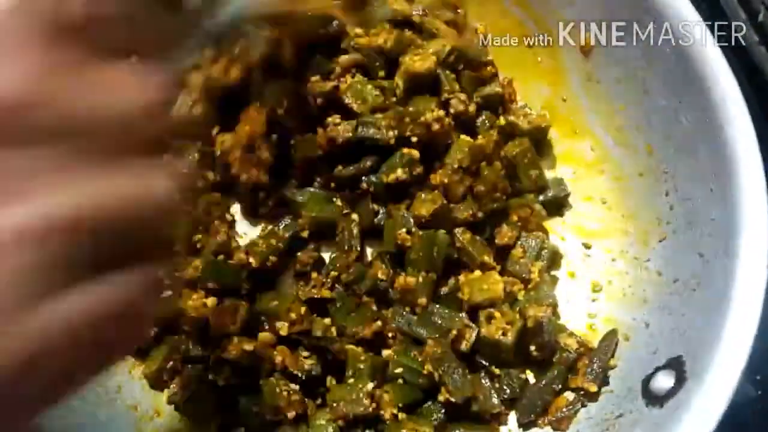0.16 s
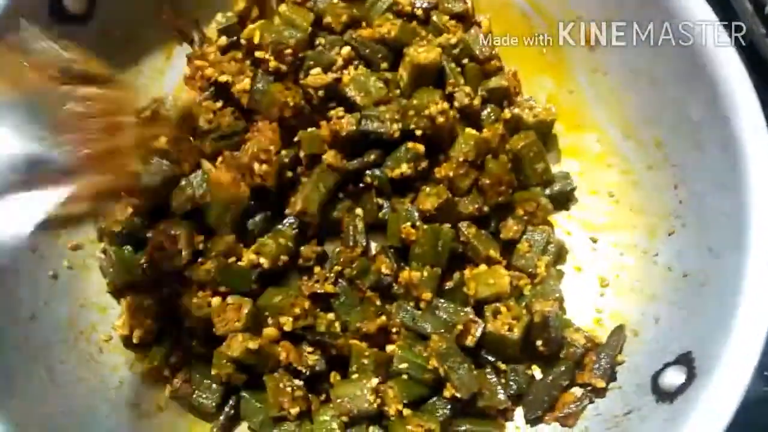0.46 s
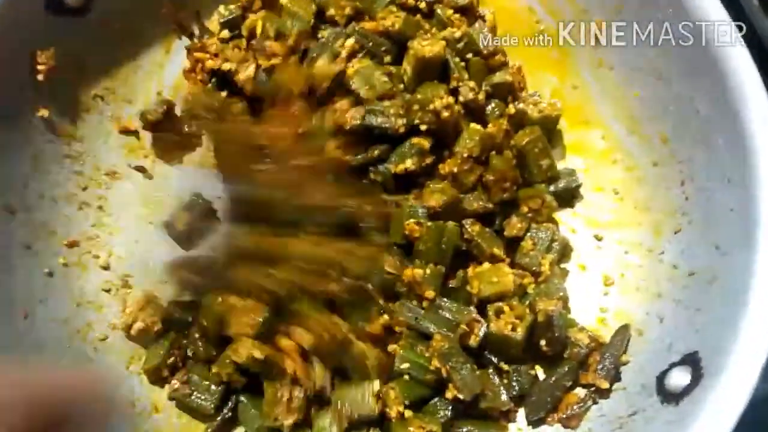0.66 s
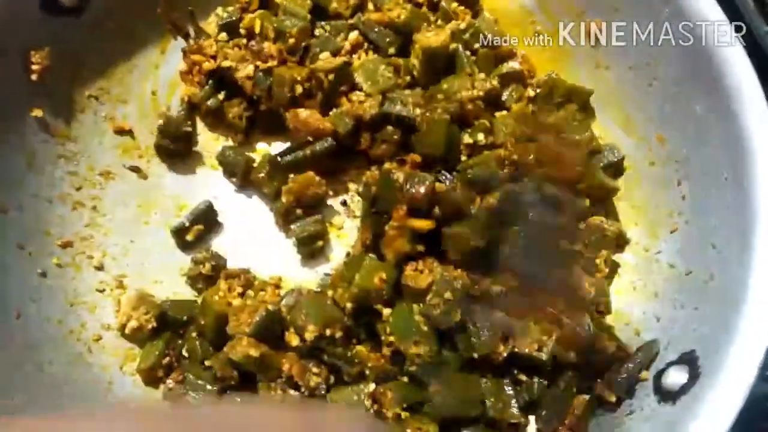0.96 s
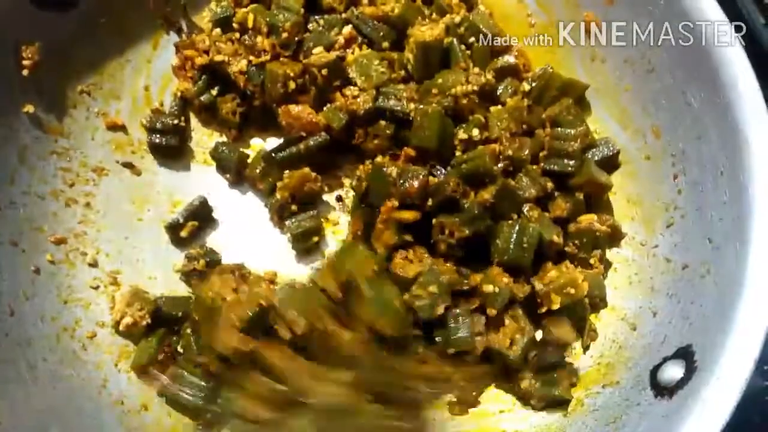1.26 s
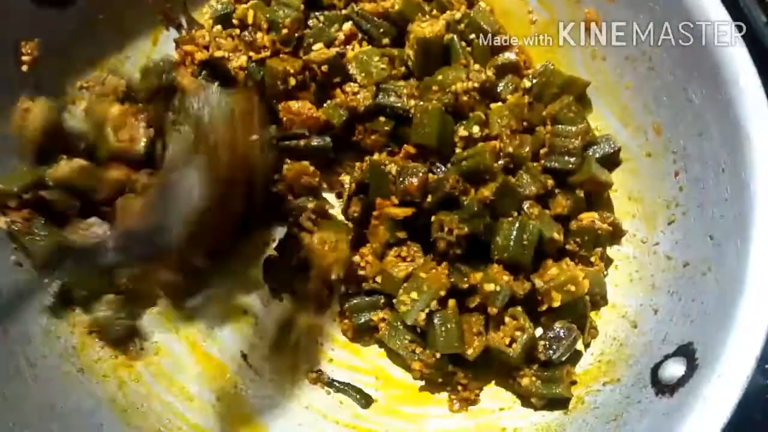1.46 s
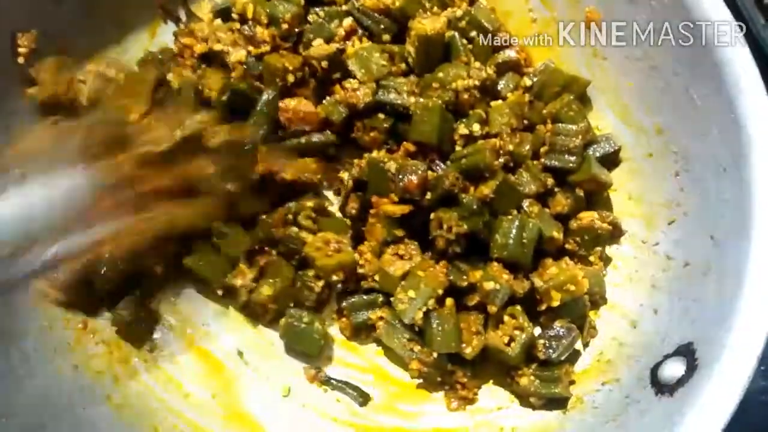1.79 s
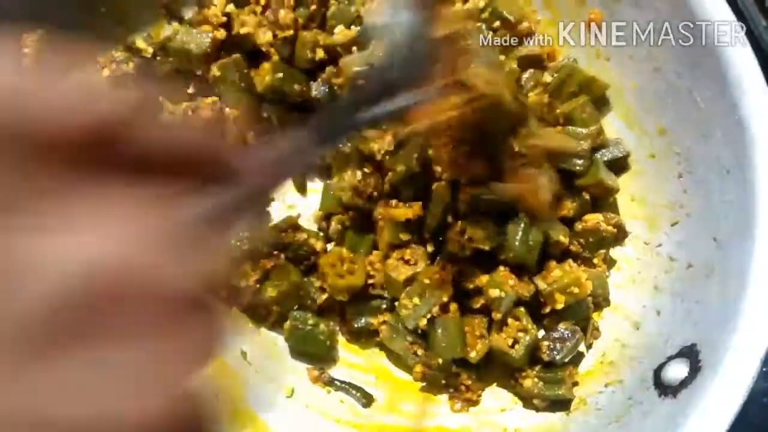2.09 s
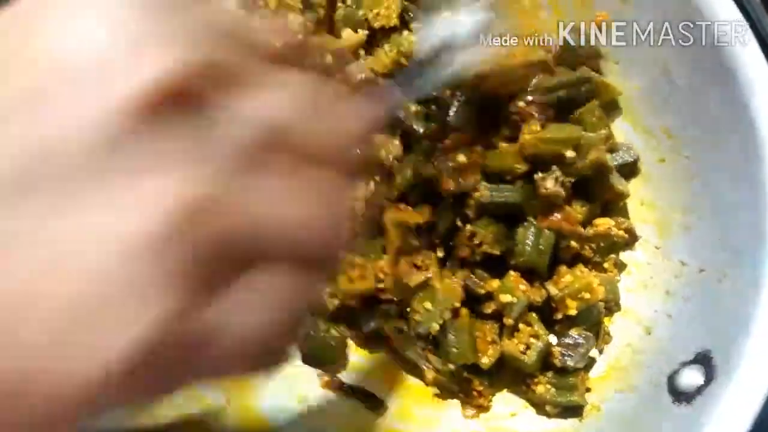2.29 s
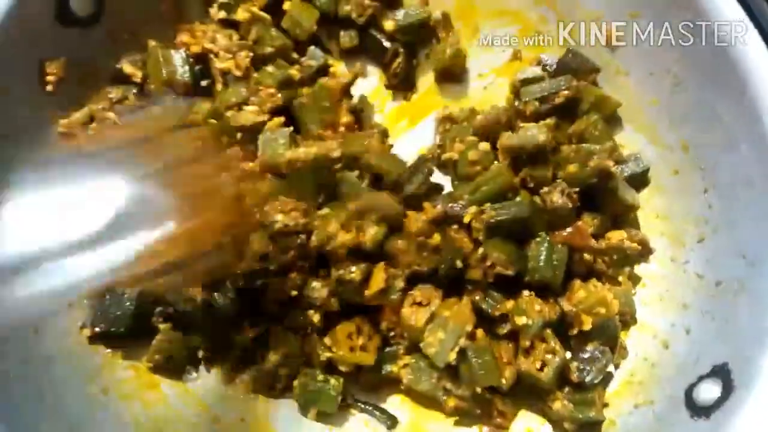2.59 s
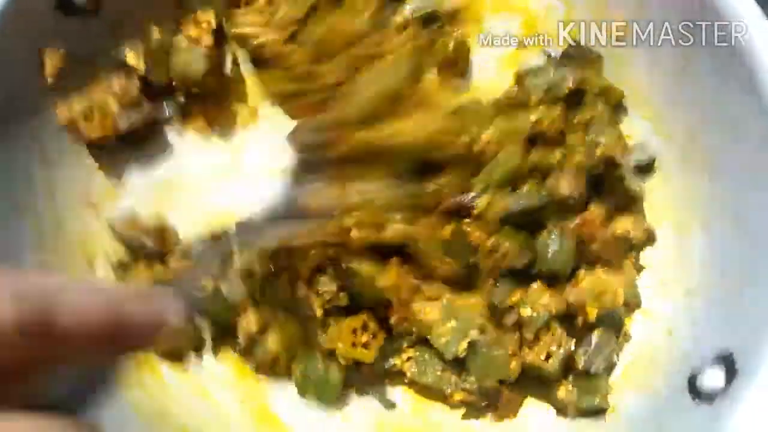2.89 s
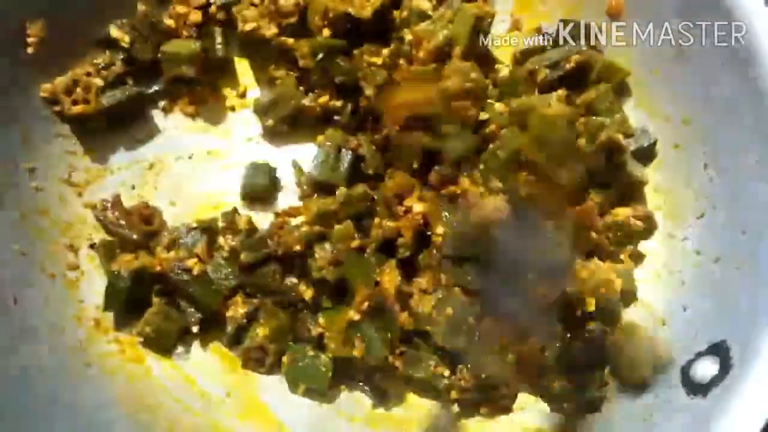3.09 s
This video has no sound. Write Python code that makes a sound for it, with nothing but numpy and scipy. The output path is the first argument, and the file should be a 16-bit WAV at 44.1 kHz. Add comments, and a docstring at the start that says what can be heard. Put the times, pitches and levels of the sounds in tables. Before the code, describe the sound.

Metal spoon stirring oily vegetable pieces in a pan, with jerky scrapes, clanks and ringing.

```python
"""A small kitchen, close to the hob: a steel spoon stirs chopped vegetables in a metal pan.
Four strokes drag over the metal in stick-slip jerks, the last three landing with clanks; the pan sings on.
Pan and spoon are sums of decaying modes, struck by single blows or driven by trains of irregular slips.
Around the strokes ticks, a light tink, rustling oily pieces (filtered grains) and soft bumps are heard,
over faint room noise and a low hum."""
import sys
import numpy as np
from scipy import signal
from scipy.fft import rfft, irfft
from scipy.io import wavfile
from scipy.ndimage import uniform_filter1d

SR = 44100
rng = np.random.default_rng(int(sys.argv[2]) if len(sys.argv) > 2 else 0)


def log_audio(samples):
    """Write samples as a 16-bit WAV file to the path given in sys.argv[1]."""
    # one column per channel
    frames = np.atleast_2d(samples).T
    # limit to full scale, then quantise
    limited = np.clip(frames, -1, 1)
    pcm = np.round(limited * 32767).astype(np.int16)
    wavfile.write(sys.argv[1], SR, pcm)


N = 143325
T = np.arange(N) / SR  # [s]
RING_T = T[:SR // 2]  # time axis of a single response [s]
DENSE_T60_S, ROOM_DB = 0.16, -7.5  # crowd of small pan modes; kitchen reverberation against direct sound

# Colours of the landing places on the pan: (frequency [Hz], gain [dB])
CLANK_A = [(300, -37), (750, -13.5), (867, 0), (1280, -14.5), (1880, 6.5), (4190, -15.5), (5600, -10.5),
           (14000, -30.5)]
CLANK_B = [(120, -49), (200, -21), (875, -2.5), (1030, -5.5), (1660, 1), (3890, -25), (8210, -22),
           (14000, -36.5)]
CLANK_C = [(300, -36), (762, -5.5), (895, 3), (1120, -8), (2670, 0.5), (5080, -25.5), (5600, -14),
           (14000, -27.5)]
MUFFLED = [(200, -21), (1100, 13), (2000, 8.5), (2800, -24)]
# Treble colour of oily pieces, and of the splash in a tink: (frequency [Hz], gain [dB])
RUSTLE_HISS = [(1500, -31), (3000, 0.5), (5500, -2), (8200, 5), (11000, 0), (14000, -2)]


def amp(db):
    """Decibels to gain."""
    return 10 ** (np.asarray(db) / 20)


def unit(x):
    """Scale to an rms of one."""
    return x / np.sqrt(np.mean(x ** 2))


def norm(x):
    """Scale to an energy of one."""
    return x / np.sqrt(np.sum(x ** 2))


def fade(t, t60):
    """Exponential decay by 60 dB in t60 seconds."""
    return np.exp(-np.log(1000) * t / t60)


def sine(hz, t, turn=0):
    """Sine of a steady pitch, started at a fraction of a turn."""
    return np.sin(2 * np.pi * (hz * t + turn))


def conv(x, h):
    """Pass x through the response h."""
    return signal.fftconvolve(x, h)[:len(x)]


def colour(x, points):
    """Causal minimum-phase filter through (Hz, dB) points, made by folding the cepstrum."""
    hz, db = np.array(sorted(points)).T
    f = np.fft.rfftfreq(4096, 1 / SR) + 1  # 1 Hz up, to keep the logarithm finite
    gain = amp(np.interp(np.log(f), np.log(hz), db))
    low_cut = np.minimum(f / hz[0], 1) ** 2
    cepstrum = irfft(np.log(gain * low_cut))
    half = len(cepstrum) // 2
    cepstrum[1:half] *= 2
    cepstrum[half + 1:] = 0
    return conv(x, irfft(np.exp(rfft(cepstrum))))


def add(out, s, x, db):
    """Mix in a blow at s seconds; a unit-energy x has the energy of 30 ms at the level db."""
    blow_s = .03
    i = max(int(s * SR), 0)
    out[i:i + len(x)] += (amp(db) * np.sqrt(blow_s * SR) * norm(x))[:N - i]


def walk(rate):
    """Random wander: normal values of spread one, rate times a second, joined by straight lines."""
    return np.interp(T * rate, np.arange(N // 20), rng.standard_normal(N // 20))


def grains(rate, scatter_db):
    """Irregular clicks, rate a second on average, of uneven size and random sign."""
    clicks = rng.random(N) < rate / SR
    size = amp(scatter_db * np.clip(rng.standard_normal(N), -2, 2))
    return unit(clicks * size * rng.choice([-1, 1], N))


def burst(t60):
    """Decaying noise of unit energy."""
    return norm(rng.standard_normal(len(RING_T)) * fade(RING_T, t60))


def pan(length, crack_db=-6):
    """Response of the pan at one random spot: a crack, a crowd of short modes, strong modes and the kitchen."""
    # Strong modes of pan and spoon in contact, before each spot's scatter:
    # (frequency [Hz], t60 [s], level [dB])
    pan_modes = [(907.3, 0.097, 9), (1101, 0.18, 8.5), (1378, 0.14, 7.5), (1879, 0.32, 8), (2141, 0.083, 7),
                 (2660, 0.1, 9.5), (3500, 0.17, 9.5), (4712, 0.12, 14.5), (5390, 0.16, 13.5),
                 (6260, 0.18, 14), (8440, 0.17, 15.5)]
    crack_s, room_t60_s = 0.0013, 0.48  # the crack falls to 1/e in crack_s
    spot_db, spot_detune = 3, .012  # scatter of mode level, and of mode pitch as a fraction
    crack = norm(burst(crack_s * np.log(1000)) + (RING_T == 0))
    crowd = burst(DENSE_T60_S * length)
    room = amp(ROOM_DB) * burst(room_t60_s)
    h = amp(crack_db) * crack + np.sqrt(length) * (crowd + room)
    for hz, t60, db in pan_modes:
        strength, load = rng.uniform(-0.93, 1, 2)
        size = amp(db + spot_db * strength) * 2 * np.log(1000) / (t60 * SR)
        spot_hz = hz * (1 + spot_detune * load)
        h = h + size * min(length, 1) * fade(RING_T, t60) * sine(spot_hz, RING_T, rng.random())
    return h


def spoon(length):
    """Response of the spoon's own modes; a short length means that it is damped."""
    # The spoon's modes: (frequency [Hz], level [dB], t60 at length one [s])
    spoon_modes = [(2900, -4.5, 0.091), (4360, -0.5, 0.085), (4650, -0.5, 0.19), (6390, 0, 0.11),
                   (8000, -1, 0.12), (12500, 1.5, 0.078)]
    return norm(sum(amp(db) * fade(RING_T, t60 * length) * sine(hz, RING_T) for hz, db, t60 in spoon_modes))


def scrape(curve, path, count=4):
    """The spoon's edge sticks and slips in jerks, passing over several spots that each ring differently."""
    # Bands of the two level columns of a stroke: (low edge [Hz], high edge [Hz])
    band_edges = [(200, 3000), (3000, 15000)]
    slips_per_s, slip_scatter_db, grit_db = 400, 5.5, -11  # grit: steady noise under the slips
    jerk_db, jerks_per_s = 2.5, 110
    trim_db, lead_s, release_s = -2, 0.0092, 0.0056  # the curve plays lead_s ahead of its listed times
    s, *levels = np.array(curve).T

    slips = grains(slips_per_s, slip_scatter_db) + amp(grit_db) * rng.standard_normal(N)
    evened = slips / np.sqrt(uniform_filter1d(slips ** 2, size=700))
    jerks = evened * amp(jerk_db * walk(jerks_per_s))

    t = T + lead_s
    outside_s = np.maximum(s[0] - t, 0) + np.maximum(t - s[-1], 0)
    contact = np.exp(-outside_s / release_s)
    drives = [jerks * contact * amp(np.interp(t, s, db) + trim_db) for db in levels]

    out = 0
    for spot in np.eye(count):
        # crossfade from spot to spot along the stroke
        near = np.sqrt(np.interp(t, np.linspace(s[0], s[-1], count), spot))
        body = colour(pan(1, crack_db=-8.5), path)
        for edges, drive in zip(band_edges, drives):
            band_filter = signal.butter(3, edges, "band", fs=SR, output="sos")
            out = out + conv(drive * near, norm(signal.sosfilt(band_filter, body)))
    return out


def scrapes():
    """Four strokes: stick-slip friction drives the pan, each along its own path over the metal."""
    # Strokes: (time before the lead [s], level below 3 kHz [dB], treble level [dB]), levels before the trim
    stroke_1 = [(.175, -56, -56), (.235, -41, -43), (.262, -30, -40), (.32, -32.5, -44), (.35, -29.5, -41),
                (.395, -27, -41.5), (.445, -45, -48.5)]
    stroke_2 = [(1.968, -31.5, -36), (1.995, -27.5, -28.5), (2.012, -33, -35), (2.045, -26.5, -32.5)]
    stroke_3 = [(2.462, -37, -52), (2.488, -24, -33), (2.506, -35, -37.5), (2.575, -42.5, -75)]
    stroke_4 = [(2.96, -31, -40.5), (2.985, -22.5, -33.5), (3.008, -24.5, -31), (3.024, -30, -32.5)]
    # Colour of the metal along each stroke: (frequency [Hz], gain [dB])
    path_1 = [(250, -26.5), (700, -14.5), (920, -1.5), (1400, 0), (2000, -5.5), (2900, -16.5), (3580, -17),
              (5270, -23.5), (8300, -24), (14000, -36.5)]
    path_2 = [(300, -33.5), (800, -10.5), (1090, -5.5), (1500, -11), (2050, 2.5), (2800, -10.5),
              (3290, -12.5), (4120, -15), (14000, -29.5)]
    path_3 = [(200, -15), (875, -1), (1880, -1.5), (2090, -12.5), (3500, -13), (4330, -21.5), (8070, -24),
              (14000, -39)]
    path_4 = [(300, -49), (880, -17.5), (1600, -14), (2050, -8), (3200, -23), (4620, -21), (14000, -38)]
    first_two = scrape(stroke_1, path_1) + scrape(stroke_2, path_2)
    return first_two + scrape(stroke_3, path_3) + scrape(stroke_4, path_4)


def squeals():
    """The edge catches and briefly judders at one resonance, rough in pitch, with a short ring after it."""
    # Squeals: (loudest at [s], mean frequency [Hz], peak level before the ring [dB], half length to 1/e [s])
    squeal_list = [(0.271, 1428, -34, 0.0099), (0.345, 1201, -29, 0.0068), (2.001, 1090, -30, 0.0062),
                   (2.026, 3390, -32, 0.0079), (2.045, 1945, -28, 0.0086), (2.478, 1321, -26, 0.0054),
                   (3.001, 1810, -22.5, 0.011)]
    out, waver = 0, 1 + .04 * walk(700)
    for s, hz, db, width in squeal_list:
        swell = np.exp(-((T - s) / width) ** 2)
        tone = np.sin(2 * np.pi * np.cumsum(hz * waver) / SR)
        out = out + amp(db) * np.sqrt(2) * swell * tone
    return out + amp(ROOM_DB) * conv(out, burst(DENSE_T60_S))


def clanks():
    """The spoon lands on the metal: one blow excites the pan, coloured by the landing place."""
    # Landings: (time [s], level [dB], ring length factor, colour of the place)
    landings = [(0.824, -43.5, 0.44, MUFFLED), (1.9512, -27, 1.1, CLANK_A), (2.0354, -44, 0.15, CLANK_A),
                (2.042, -33.5, 0.55, CLANK_A), (2.415, -55, 0.34, MUFFLED), (2.422, -28.5, 1.42, CLANK_B),
                (2.91, -29.5, 0.62, CLANK_C), (2.9332, -36, 0.17, CLANK_C), (2.9722, -34, 0.17, CLANK_C)]
    out = np.zeros(N)
    for s, db, length, place in landings:
        add(out, s, colour(pan(length), place), db)
    return out


def rings():
    """Single modes swell under the dragging spoon and ring out freely."""
    # Free ringing: (loudest at [s], frequency [Hz], level before the waver [dB], rise from 1/e [s], t60 [s])
    ring_list = [(0.438, 1904, -40, 0.18, 0.18), (0.494, 1901, -35, 0.04, 0.31),
                 (0.46, 1223, -51, 0.08, 1.2), (0.46, 682, -55.5, 0.037, 0.76),
                 (.39, 3570, -47, 0.092, 0.25), (.62, 1900, -45.5, 0.07, 0.36),
                 (1.355, 4400, -59, 0.025, 0.15), (1.37, 1903, -52.5, 0.03, 0.28),
                 (3.04, 684, -56, 0.06, 0.99), (2.61, 1223, -45, 0.025, 1.65)]
    out = 0
    for s, hz, db, rise, t60 in ring_list:
        swell = np.exp(-(np.minimum(T - s, 0) / rise) ** 2)
        shape = swell * fade(np.maximum(T - s, 0), t60)
        level = amp(db + 2 * walk(24.98))  # wavers with a spread of 2 dB
        out = out + level * np.sqrt(2) * shape * sine(hz, T, rng.random())
    return out


def ticks():
    """The spoon's edge skips over seeds and pieces: small sharp pan blows, each with a brief rising chirp."""
    # Skips: (time [s], level with the chirp [dB])
    skips = [(.096, -42), (0.193, -35), (0.2268, -40), (0.249, -43), (1.4715, -45.5), (2.5098, -37.5),
             (2.5462, -42), (2.571, -47)]
    # Colour of a skip: (frequency [Hz], gain [dB])
    skip_colour = [(250, -4.5), (800, 11), (1300, -4.5), (2100, -14), (2700, 1.5), (3500, -1), (4200, -6.5),
                   (4900, -5), (7000, -7.5), (14000, -23)]
    chirp_hz, chirp_hz_per_s, chirp_s, chirp_db = 2984, 193000, 0.0022, -3  # chirp_s: time of peak and width
    out = np.zeros(N)
    swell = np.exp(-((RING_T - chirp_s) / chirp_s) ** 2)
    chirp = norm(swell * sine(chirp_hz + chirp_hz_per_s * RING_T / 2, RING_T))
    for s, db in skips:
        knock = norm(colour(pan(0.8), skip_colour))
        add(out, s, knock + amp(chirp_db) * chirp, db)
    return out


def tinks():
    """The spoon barely touches and rings by itself, with a short splash of noise."""
    # Light touches: (time [s], level with the splash [dB], ring length factor)
    touches = [(0.014, -45.5, 1.26)]
    splash_db, splash_s = 4, 0.019  # against the ring; fall to 1/e at length one
    out = np.zeros(N)
    for s, db, length in touches:
        splash = colour(burst(splash_s * np.log(1000) * length), RUSTLE_HISS)
        add(out, s, spoon(length) + amp(splash_db) * norm(splash), db)
    return out


def vegetables():
    """Soft pieces tumble in the pan; their oily skins crackle and, when pushed hard, make the spoon ring."""
    # Pieces sliding over each other: (time [s], body level [dB], treble crackle level [dB])
    rustle = [(0, -58, -71.5), (.07, -56.5, -53), (.23, -42.5, -51), (.5, -62.5, -61), (.79, -74, -74.5),
              (.84, -62, -66), (0.899, -56.5, -56.5), (1.0, -70.5, -68), (1.307, -85, -82.5),
              (1.358, -51.5, -53), (1.439, -57.5, -59.5), (1.503, -43, -52), (1.55, -53.5, -58.5),
              (1.72, -73.5, -81.5), (2.4, -78, -89), (2.56, -49.5, -58), (2.72, -63.5, -69.5),
              (3.24, -71, -70.5)]
    # Colour of the soft body: (frequency [Hz], gain [dB])
    body_colour = [(120, -17.5), (310, 2), (520, -2.5), (850, 3), (1300, -14.5), (2000, -1), (3500, -17),
                   (6000, -30)]
    grains_per_s, scatter_db = 1400, 4
    spoon_rub_db = -50  # crackle level at which the spoon rings as loud as the crackle
    s, body_db, hiss_db = np.array(rustle).T

    tumble = conv(grains(grains_per_s, scatter_db), pan(0.24))
    body = unit(colour(tumble, body_colour))
    crackle = unit(colour(grains(grains_per_s, scatter_db) + rng.standard_normal(N), RUSTLE_HISS))

    push = amp(np.interp(T, s, hiss_db))
    rub = unit(conv(crackle, spoon(0.13))) * np.minimum(push / amp(spoon_rub_db), 1) ** 2
    return body * amp(np.interp(T, s, body_db)) + (crackle + rub) * push


def bumps():
    """The pan bumps on its stand: low, soft thuds of one damped resonance in a dull rumble."""
    # Dull bumps: (time [s], level [dB], resonance [Hz])
    thuds = [(.54, -56, 264), (0.743, -57, 206), (1.022, -59.5, 197), (1.134, -60, 195),
             (2.199, -56.5, 235.4), (2.829, -58.5, 181)]
    rise_s, t60_s, thud_top_hz = 0.0054, .22, 270
    out = np.zeros(N)
    low_pass = signal.butter(6, thud_top_hz, fs=SR, output="sos")
    shape = (1 - np.exp(-RING_T / rise_s)) * fade(RING_T, t60_s)
    for s, db, hz in thuds:
        rumble = unit(signal.sosfilt(low_pass, rng.standard_normal(len(RING_T))))
        add(out, s, shape * (sine(hz, RING_T) + .5 * rumble), db)
    return out


def kitchen():
    """Faint coloured room noise and a low hum that wavers in level."""
    # Colour of the room noise: (frequency [Hz], gain [dB])
    floor_colour = [(30, -5), (186, 1), (373, -14), (894, -2.5), (1740, -8.5), (5690, -33), (14000, -37)]
    floor_db, hum_hz, hum_db = -63.5, 51.3, -71.5
    hum = np.sqrt(2) * sine(hum_hz, T) * amp(hum_db + 1.6 * walk(5.2))
    return amp(floor_db) * unit(colour(rng.standard_normal(N), floor_colour)) + hum


def scene():
    """Four strokes of the spoon among the vegetables, in one channel."""
    strokes = scrapes() + squeals() + clanks() + rings()
    small_sounds = ticks() + tinks() + vegetables() + bumps()
    return (strokes + small_sounds + kitchen())[None]


def record(dry):
    """The recorder cuts the top with a steep low-pass at 14.6 kHz."""
    return signal.sosfilt(signal.ellip(10, .2, 70, 14600, fs=SR, output="sos"), dry)


dry = scene()
out = record(dry)
log_audio(out)
```